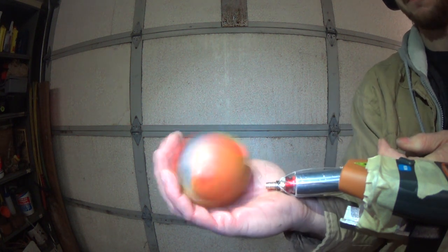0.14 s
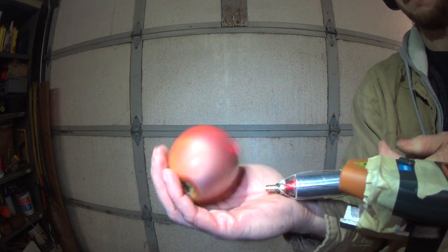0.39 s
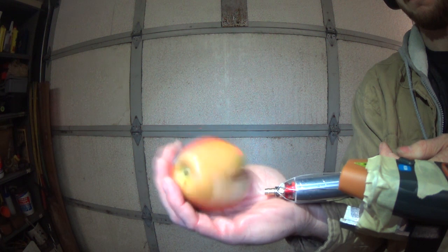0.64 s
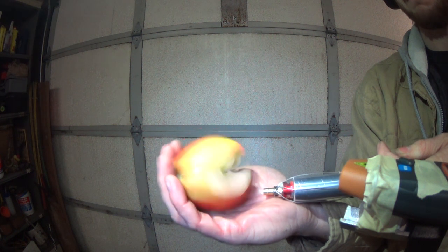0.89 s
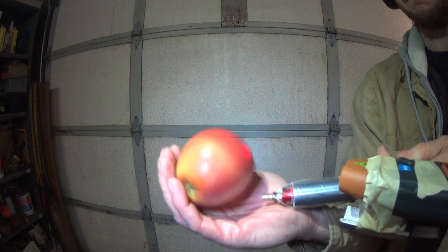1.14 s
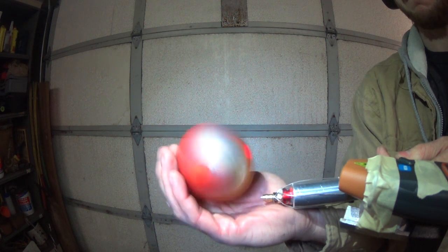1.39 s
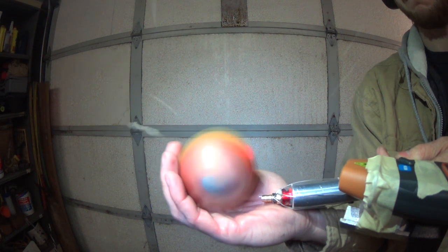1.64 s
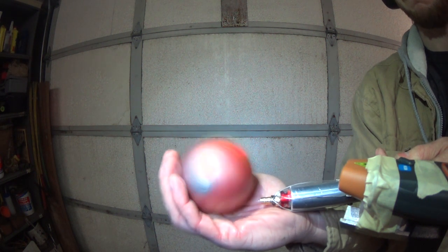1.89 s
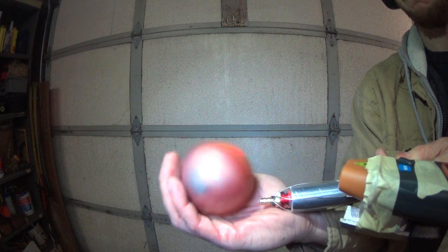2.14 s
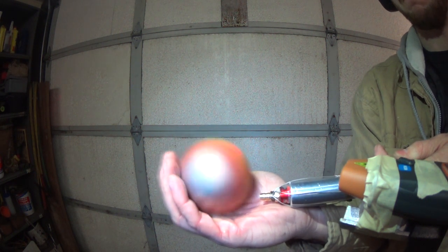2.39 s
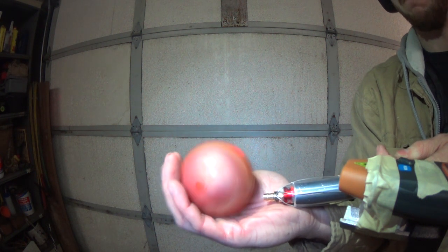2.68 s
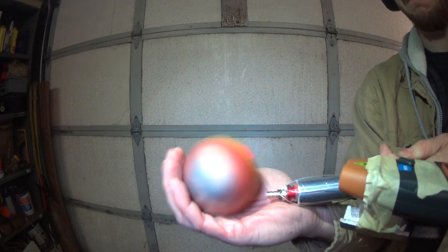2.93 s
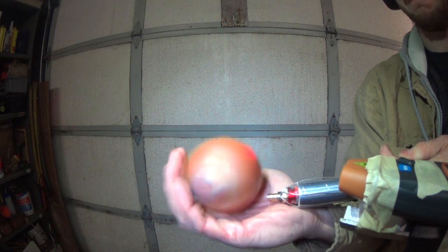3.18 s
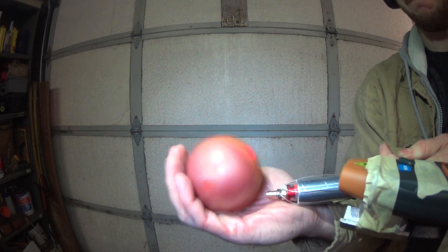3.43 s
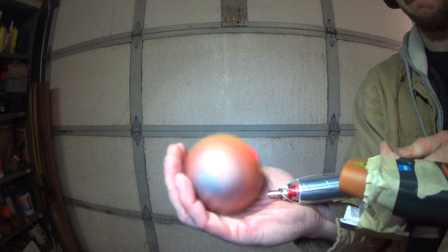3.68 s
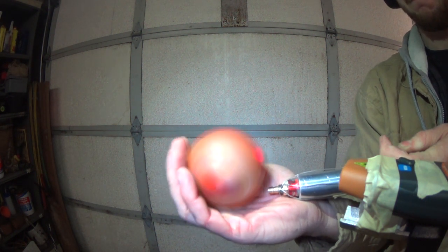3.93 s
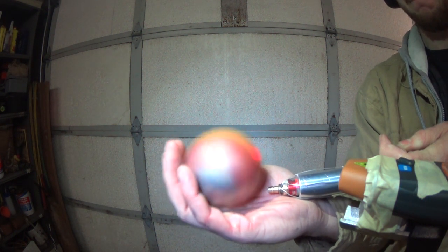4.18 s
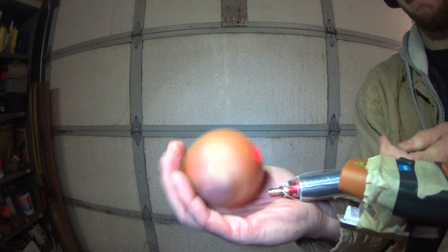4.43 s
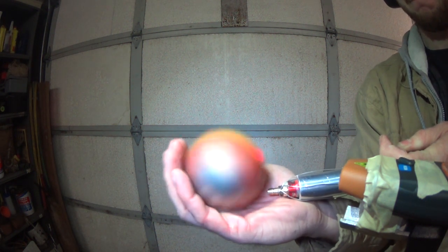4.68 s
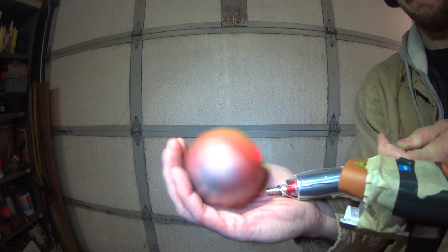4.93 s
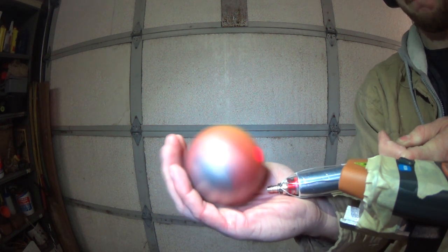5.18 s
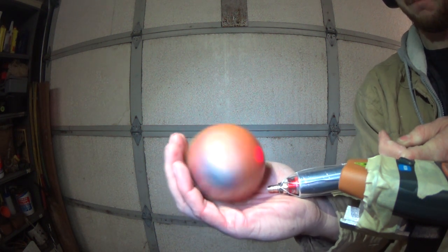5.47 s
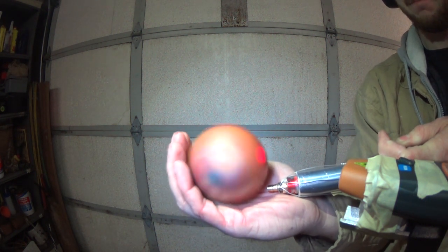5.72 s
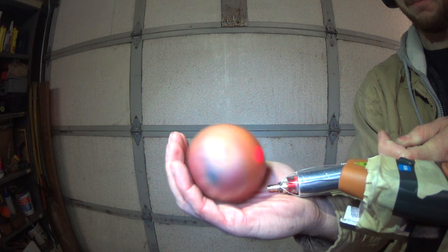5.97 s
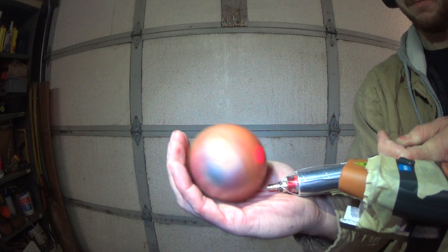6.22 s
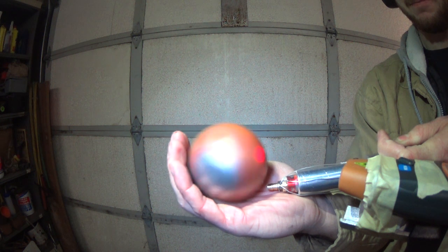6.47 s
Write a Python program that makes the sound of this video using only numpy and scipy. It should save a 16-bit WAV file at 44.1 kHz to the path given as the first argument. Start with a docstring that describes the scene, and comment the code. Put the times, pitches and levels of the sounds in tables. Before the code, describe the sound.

A compressed-air nozzle hisses loudly and steadily against an apple spinning in a cupped palm, with soft air thumps buffeting the close microphone.

```python
"""Apple spun by a blow gun

A blow gun spins an apple up to speed in a cupped palm, an arm's length from a small camera in a garage.
The nozzle hisses at the very top and the jet roars where it strikes fruit and hand: filtered noise in bands.
The two dimples chop the jet in level, mainly twice a turn.
Spilled air buffets the two microphone ports: a patter of small pushes, an even flow and single thumps."""
import sys
import numpy as np
from scipy import signal
from scipy.fft import rfft, irfft, next_fast_len
from scipy.io import wavfile
from scipy.ndimage import uniform_filter1d

SR = 44100
rng = np.random.default_rng(int(sys.argv[2]) if len(sys.argv) > 2 else 0)


def linear_from_db(decibels):
    """Turn decibels (scalar or array-like) into linear amplitude factors; 0 gives 1."""
    return 10 ** (np.asarray(decibels, float) / 20)


def digitize_waveform(pressure):
    """Quantize a signal to 16-bit integers and store it at the path in sys.argv[1].

    Rows of a 2-D input are taken as channels; values are limited to [-1, 1].
    """
    field = np.atleast_2d(pressure).T
    bounded = np.clip(field, -1, 1)
    quanta = np.round(bounded * 32767).astype(np.int16)
    wavfile.write(sys.argv[1], SR, quanta)


N = 290839
SIZE = next_fast_len(N)
T = np.arange(N) / SR
TOP_HZ = 15760  # nothing of the jet passes above this


def column(table, k, hz):
    """Column k of a spectrum, straight on a log-frequency axis."""
    rows = np.array(table, float)
    return np.interp(np.log(hz + 1), np.log(rows[:, 0]), rows[:, k])


def unit(x):
    """Scale to rms 1."""
    return x / np.sqrt(np.mean(x ** 2))


def walk(rate):
    """Random levels held 1 / rate s and slewed twice; rms 1."""
    hold = int(SR / rate)
    steps = np.repeat(rng.standard_normal(N // hold + 1), hold)
    slewed = uniform_filter1d(uniform_filter1d(steps, hold), hold)
    return unit(slewed[:N])


def bell(x, centre, width):
    """A smooth bump of height 1, down to 1 / e half a width from its centre."""
    return np.exp(-(2 * (x - centre) / width) ** 2)


def bumps(events):
    """A smooth swell or dip in dB at each (time [s], level [dB], length [s])."""
    return sum(db * bell(T, s, length_s) for s, db, length_s in events)


# how squarely the jet meets the fruit as the hand drifts: (time [s], roar gain [dB])
AIM_DRIFT = [(0, -0.6), (.6, -0.2), (1.6, .1), (2.6, -0.43), (3.2, -0.35), (4, 0.47), (5.2, 0.6),
             (6.1, 0.74), (6.59, 0.6)]
# the fruit rocks into the jet (+) or out of it (-), mostly before its spin steadies it:
# (time [s], roar gain [dB])
LURCHES = [(.03, 2), (.065, -1.5), (.1, 2), (.17, 2.5), (.21, -2), (.29, 2), (.535, -3), (.655, -1.5),
           (.7, 0.5), (.83, -1.5), (.87, -1.5), (.95, 0.5), (1.05, -1.5), (1.12, 1), (1.2, -1), (1.3, -3),
           (1.38, -1.5), (6.55, -2)]


def aim_on_fruit():
    """Gain of the roar in dB: the hand's slow drift plus the fruit's short lurches."""
    lurch_s = 0.026
    drift_db = np.interp(T, *np.transpose(AIM_DRIFT))
    return drift_db + bumps((s, db, lurch_s) for s, db in LURCHES)


# basic colour of the jet: (frequency [Hz], relative density [dB per Hz])
JET_COLOUR = [(1150, -15), (1800, -10), (2000, -8.5), (2800, -10), (3400, -7), (3800, -6), (4400, -4.5),
              (5600, -1.3), (6600, 1.5), (7800, -5), (9900, -9.5), (12400, 0), (13600, -2), (14800, -1.06)]
# hollows between hand and fruit and the dips between them:
# (frequency [Hz], width [Hz], level over the jet [dB])
PALM_HOLLOWS = [(1412, 290, 8), (2060, 100, -4), (2286, 340, 7), (2500, 98, 2), (2560, 80, -2.5),
                (3270, 260, 1)]
# bright bands of the tip: (frequency [Hz], width [Hz], level over the jet [dB])
NOZZLE_BANDS = [(10960, 730, 3), (14830, 1700, 5.5)]
# uneven echoes off hand and camera: (frequency [Hz], width [Hz], left level [dB], right level [dB])
SIDE_ECHOES = [(2480, 150, 0, 5), (2680, 220, 3, 0), (3440, 350, -3, 1), (3760, 280, 0, -4)]


def jet_colour(hz):
    """Left and right spectrum in dB: turbulence shaped by palm hollows, nozzle tip and echoes."""
    colour_db = column(JET_COLOUR, 1, hz)
    for table in (PALM_HOLLOWS, NOZZLE_BANDS):
        colour_db = colour_db + sum(db * bell(hz, f, width) for f, width, db in table)
    echoes_db = sum(np.outer(sides_db, bell(hz, f, width)) for f, width, *sides_db in SIDE_ECHOES)
    # little jet noise in the bass: 14 dB less per octave below 1150 Hz
    return colour_db + echoes_db - 14.0 * np.log2(np.maximum(1150 / (hz + 1), 1))


# how the jet reaches the two sides, before the uneven echoes:
# (frequency [Hz], left minus right [dB], left leads by [radians], likeness [0-1])
JET_SIDES = [(1450, 0.1, 0.4, 0.65), (1750, 0.5, 1.1, 0.24), (2000, 1.0, 1.6, 0.39), (2250, 5.9, 0.5, 0.7),
             (2550, -1.5, -1.0, 0.48), (2900, 1.5, -0.7, 0.55), (3300, -7.2, -0.4, 0.64),
             (3600, -4.5, 1.2, 0.61), (3900, -1.4, 0.4, 0.83), (5000, -1.7, 0.6, 0.89),
             (6600, 2.2, 0.7, 0.93), (7800, 4.6, 0.2, 0.84), (9000, 1.9, -0.2, 0.83),
             (14000, -0.0, -0.0, 0.99)]


def jet_noise(hz):
    """Stereo spectrum of the hiss: direct sound plus a part from the walls that differs from side to side."""
    direct, left, right = rfft(rng.standard_normal((3, SIZE)))
    alike = np.clip(column(JET_SIDES, 3, hz), 0, 1)
    both = np.sqrt(alike) * direct + np.sqrt(1 - alike) * np.array([left, right])
    lean = linear_from_db(column(JET_SIDES, 1, hz) / 2) * np.exp(1j * column(JET_SIDES, 2, hz) / 2)
    lean_rms = np.sqrt((abs(lean) ** 2 + abs(lean) ** -2) / 2)  # leaning keeps the power
    both = both * np.array([lean, 1 / lean]) / lean_rms
    return both * linear_from_db(jet_colour(hz)) * (hz < TOP_HZ)


# the apple spins up: (time [s], turns per second [Hz])
SPIN = [(0, 4), (1.3, 4), (2, 22), (2.5, 30.5), (4.3, 35.5), (5.2, 43), (5.8, 54), (6.6, 62)]


def dimple_chop():
    """Turn angle in radians and depth of the chop in dB, which grows as the fruit speeds up."""
    full_db, steady_hz = 1, 32  # depth, reached once the fruit turns this fast
    turns_hz = np.interp(T, *np.transpose(SPIN))
    turn = 2 * np.pi * np.cumsum(turns_hz) / SR
    return turn, full_db * np.minimum(turns_hz / steady_hz, 1) ** 2


def jet(fruit_db, nozzle_db, palm_db):
    """Turbulent hiss in overlapping bands, chopped by the dimples, with palm, roar and hiss set apart."""
    palm_top_hz, fruit_top_hz = 3000, 9000  # where palm, fruit and nozzle take over from each other
    hz = np.fft.rfftfreq(SIZE, 1 / SR)
    noise = jet_noise(hz)
    turn, depth_db = dimple_chop()
    parts = np.zeros((3, 2, N))
    octaves = np.log2((hz + 1) / 1000)
    for centre in np.arange(-1, 4.4, 1 / 3):  # third-octave bands, in octaves from 1 kHz
        share = np.clip(1 - 3 * abs(octaves - centre), 0, 1)
        # a passing dimple sweeps its dip across the spectrum
        angle = turn + .6 * centre
        chop_db = depth_db * (np.cos(2 * angle) + .5 * np.cos(angle))
        flicker_db = 0.18 * walk(20) + 0.93 * walk(100)
        band = irfft(noise * share, SIZE)[:, :N] * linear_from_db(chop_db + flicker_db)
        parts[np.searchsorted([palm_top_hz, fruit_top_hz], 1000 * 2 ** centre)] += band
    palm, roar, hiss = map(unit, parts)
    roar_db = 0.43 * walk(30) + .5 * walk(150)
    hiss_db = 0.29 * walk(35) + 0.51 * walk(200)
    return palm * linear_from_db(palm_db) + roar * linear_from_db(fruit_db + roar_db) + hiss * linear_from_db(nozzle_db + hiss_db)


# air on a port: (frequency [Hz], relative sum of the sides [dB per Hz], difference over the sum [dB])
PORT_RESPONSE = [(30, -10.5, -16), (70, -4.5, -9), (110, -0.5, -10), (145, -6.5, -5), (195, 1, -2.5),
                 (453, 2, 4), (870, 0.5, 8), (1490, -6, 10), (3000, -38, -30)]


def on_port(hz, port):
    """Left and right response to air on one port: the stereo matrix turns the difference a quarter cycle."""
    turned = 1j * linear_from_db(column(PORT_RESPONSE, 2, hz)) * port
    return linear_from_db(column(PORT_RESPONSE, 1, hz)) * np.array([1 + turned, 1 - turned])


def from_ports(left, right):
    """The spectra of air on the left and right port, heard through both and scaled to rms 1."""
    hz = np.fft.rfftfreq(SIZE, 1 / SR)
    heard = left * on_port(hz, 1) + right * on_port(hz, -1)
    return unit(irfft(heard, SIZE)[:, :N])


# spilled air: (time [s], patter level before its random swell [dB])
GUSTS = [(0, -49), (.6, -46), (1.2, -51.5), (3.3, -50.5), (4, -48.5), (6.59, -49)]


def buffeting(count=4500):
    """A dense patter of small eddies, mostly on the left port, over a flow; it swells round strong eddies."""
    s, db = np.transpose(PUFFS)[:2]
    strong = np.zeros(N)
    strong[(s * SR).astype(int)] = linear_from_db(db)
    wake = signal.fftconvolve(strong, np.hanning(int(0.026 * SR)), "same")

    when, side, size, sign = rng.random((count, 4)).T
    size_db = np.minimum(-5.0 * np.log(1 - size), 22.0)  # many small, few large
    on_right = (side > .75) * 1
    ports = np.zeros((2, SIZE))
    np.add.at(ports, (on_right, (when * N).astype(int)), linear_from_db(size_db) * np.sign(sign - .5))
    patter = from_ports(*rfft(ports))

    # the even flow under the patter has little bass
    hz = np.fft.rfftfreq(SIZE, 1 / SR)
    draught = rfft(rng.standard_normal((2, SIZE))) * [[1], [.6]]
    flow = from_ports(*(draught / np.sqrt(1 + (260 / (hz + 1)) ** 2)))

    spill_db = np.interp(T, *np.transpose(GUSTS)) + 2.7 * walk(55) + 2.0 * walk(11)
    return patter * (linear_from_db(spill_db) + linear_from_db(-25.5) * wake) + flow * linear_from_db(-49.0 + 1.3 * walk(25))


# the strongest eddies on one port: (time [s], peak level [dB], port [1 left, -1 right])
PUFFS = [(0.014, -23, 1), (0.068, -24, 1), (0.082, -23, -1), (0.1, -23, 1), (0.147, -27, 1),
         (0.158, -21, 1), (0.175, -27, 1), (0.383, -24, 1), (0.419, -23.5, 1), (0.436, -26, 1),
         (0.492, -30, 1), (0.522, -19, 1), (0.569, -20, 1), (0.582, -19, 1), (0.665, -23, 1),
         (0.77, -18, 1), (0.913, -25, 1), (1.026, -28, 1), (1.081, -26, 1), (1.227, -31, 1),
         (1.416, -29, 1), (1.496, -20.5, 1), (1.576, -28, 1), (1.637, -24, 1), (1.744, -23, 1),
         (1.846, -24, 1), (2.0, -23.5, -1), (2.042, -26, 1), (2.114, -28, 1), (2.212, -30, 1),
         (2.479, -24, 1), (2.665, -20.5, 1), (2.739, -26, -1), (2.848, -33, 1), (2.923, -26.5, 1),
         (3.111, -24, 1), (3.199, -18, -1), (3.387, -25, 1), (3.565, -24.5, -1), (3.714, -25.5, -1),
         (3.743, -19, -1), (3.899, -31, 1), (4.094, -25, 1), (4.122, -22, 1), (4.437, -24, 1),
         (4.449, -22, 1), (4.581, -26, 1), (4.6, -23.5, 1), (4.626, -28.5, 1), (4.756, -26, -1),
         (4.781, -26, 1), (4.908, -22.5, -1), (4.935, -28, 1), (5.029, -27, -1), (5.149, -21, -1),
         (5.328, -26, 1), (5.497, -30, 1), (5.603, -31, 1), (5.994, -24.5, 1), (6.153, -30, 1),
         (6.303, -26.5, 1), (6.542, -29, 1), (6.556, -21, 1)]


def puffs():
    """The strongest eddies: one short push each, duller when it is slow."""
    push_hz, scatter = 1410, .3  # where a push turns dull; log spread from eddy to eddy
    hz = np.fft.rfftfreq(4096, 1 / SR)
    out = np.zeros((2, N + 4096))
    for s, db, port in PUFFS:
        dull_hz = push_hz * np.exp(scatter * rng.standard_normal())
        push = irfft(on_port(hz, np.sign(port)) / (1 + (hz / dull_hz) ** 2))
        start = int(s * SR)
        out[:, start:start + 4096] += np.fft.fftshift(push, axes=1) * linear_from_db(db) / abs(push).max()
    return out[:, 2048:2048 + N]  # each push is centred on its time


# the palm's sound briefly dips, as its hollows are covered or, at the end, as the jet lets off:
# (time [s], level [dB], length [s])
PALM_DIPS = [(.345, -1, .03), (.725, -7, 0.031), (1.0, -3.5, .08), (3.13, -2.5, 0.034), (6.575, -4, 0.059)]


def palm_dips():
    """Gain of the palm's sound in dB: short dips as its hollows are covered or, at the end, the jet lets off."""
    return bumps(PALM_DIPS)


def scene():
    """Jet, patter and single thumps; the better the jet hits the fruit, the more roar and the less hiss."""
    aim_db = aim_on_fruit()
    roar_db = -26 + aim_db
    hiss_db = -26 - 1.05 * aim_db
    palm_db = -38.5 + aim_db + palm_dips()
    return jet(roar_db, hiss_db, palm_db) + buffeting() + puffs()


def top_cut(x):
    """Nothing passes above the cut-off."""
    return signal.sosfilt(signal.butter(12, 17080, fs=SR, output="sos"), x)


def record(dry):
    """The camera cuts the top steeply."""
    below_top = np.fft.rfftfreq(SIZE, 1 / SR) < TOP_HZ
    mix = irfft(rfft(dry, SIZE) * below_top, SIZE)[:, :N]
    return top_cut(mix)


dry = scene()
out = record(dry)
digitize_waveform(out)
```